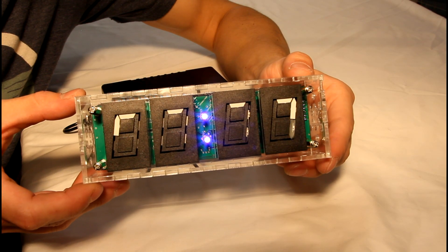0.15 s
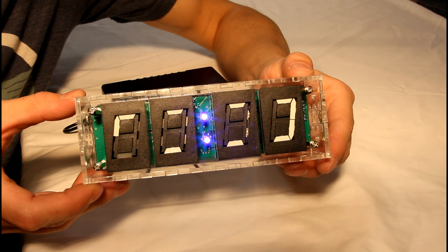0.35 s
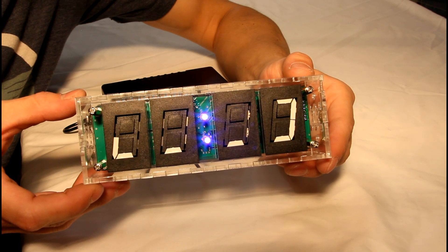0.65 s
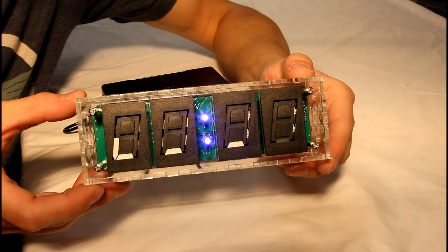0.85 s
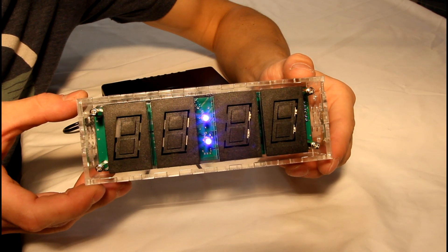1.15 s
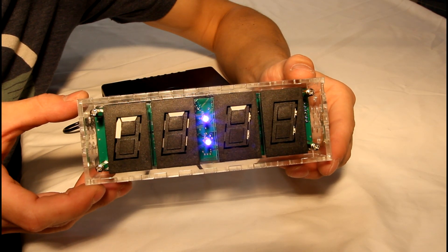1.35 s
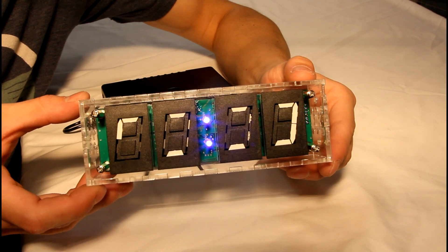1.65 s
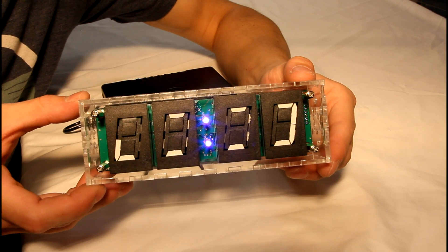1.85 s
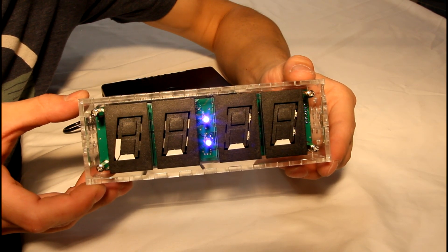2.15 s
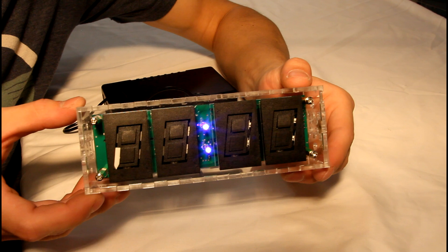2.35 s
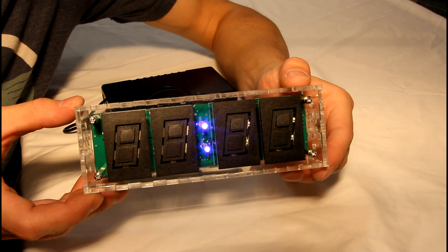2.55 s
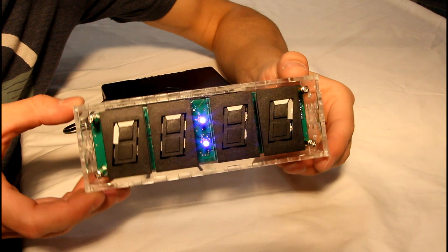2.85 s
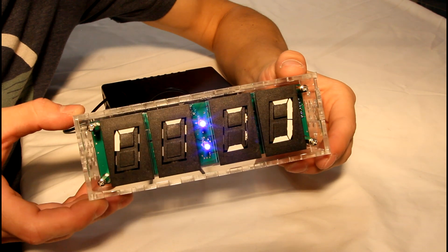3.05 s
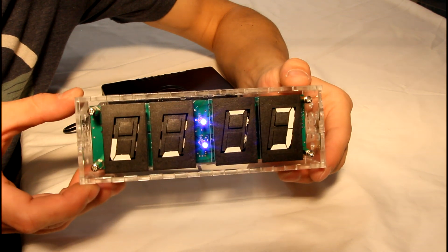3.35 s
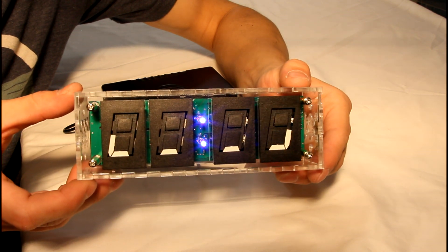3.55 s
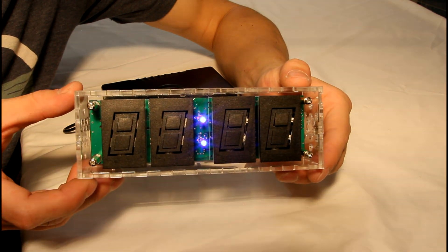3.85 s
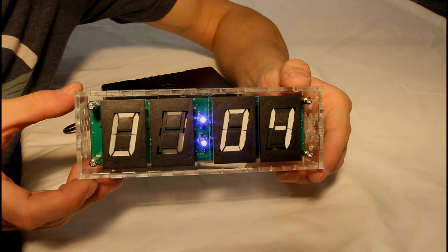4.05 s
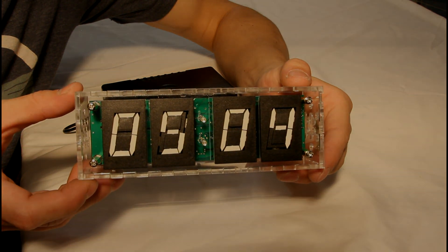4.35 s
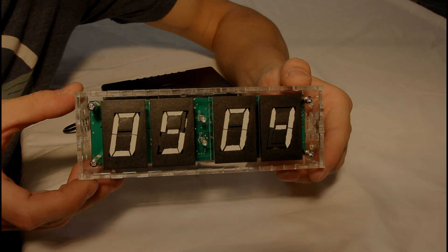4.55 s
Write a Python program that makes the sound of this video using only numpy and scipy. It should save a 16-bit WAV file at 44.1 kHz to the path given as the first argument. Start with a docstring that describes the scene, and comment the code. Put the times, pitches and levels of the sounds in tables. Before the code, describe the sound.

Close up in a small room, a flip-segment clock rattles through three matching runs of fast, crisp clicks, each flap slapping its stop and briefly ringing the plastic case. Each run lasts just over a second, with a tiny gap after it. A single louder, compact clatter finishes the sequence. Quiet hum and hiss continue underneath, and one faint tap sounds elsewhere in the room.

```python
"""Flip-segment clock in a small room

A hand-held electromagnetic clock runs a chase of 24 flaps three times, then sets the time in one burst.
Each flap ticks as its coil releases it, slaps its stop and bounces; the plastic case rings briefly.
Below lie a wavering hum, hiss, low swelling tones, a thin whine and one faint tap near the end.
The room reverberates, and the recorder's gain control ducks on the slaps."""
import sys
import numpy as np
from scipy import signal
from scipy.fft import rfft, irfft, next_fast_len
from scipy.io import wavfile
from scipy.ndimage import uniform_filter1d

SR = 44100
rng = np.random.default_rng(int(sys.argv[2]) if len(sys.argv) > 2 else 0)


def transcribe(signal):
    """Save signal, clipped to [-1, 1], as a 16-bit WAV file at the path in sys.argv[1]."""
    frames = np.atleast_2d(signal).T
    limited = np.clip(frames, -1, 1)
    pcm = np.round(limited * 32767).astype(np.int16)
    wavfile.write(sys.argv[1], SR, pcm)


N = 206652

# The flaps in chase order. Each row: lateness in ms, level in dB, hollowness, body, brightness and air
# in dB, clack in Hz and dB, ring in Hz and dB, rattle decay in ms, bounce delay in ms, bounce in dB,
# lead of the release tick in ms, tick in dB, low knock in dB. All levels are relative.
FLAPS = [(-0.29, -17, -8, 0, 0, 6, 4530, -5.5, 6660, -0.5, 2.7, 16, -22, 7.2, -18, -9),
         (.2, -22, -7, -0.5, 3, 13.5, 4220, -1, 7140, 2, 2.7, 14.6, -20, 6.2, -14, 1.5),
         (0, -20, 1, -4, 5, 13, 3900, -0.5, 6700, -1, 3, 9.7, -31, 9.4, -19, 1),
         (-.8, -21, -13, 1, -4.5, 10.5, 4170, 2.5, 6680, 5, 3.8, 21, -24, 6, -19, 8.5),
         (-0.2, -20.5, -14, -0.5, -1, 8, 4640, -2, 7600, 0, 3.2, 4.8, -10, 5.7, -15, 1),
         (0.4, -19.5, 0.5, 0.5, -9.5, 8, 4180, 2, 6400, -1, 2.3, 7.3, -9.5, 7.5, -22, -4),
         (-0.8, -16.5, -2.5, 4, -6.5, -8, 4380, 2.5, 5590, -12, 2, 8.4, -19, 7.5, -20.5, -15),
         (-1.1, -18.5, -10, -2, -4, -5, 4640, -4.5, 7840, 4, 4.1, 7.8, -6.5, 6.4, -18, -7),
         (-1, -17.5, -5, 0, 3, -3, 4140, 1, 6730, 4, 2.7, 13, -23, 9.7, -22, 3),
         (-1.2, -18, -6, 0.5, 4, -1, 4210, -2.5, 7170, 1.5, 3.6, 6.4, -15, 8, -22, 7.5),
         (-1.5, -18, -3, -0.5, 5, 5, 4120, -3.5, 6570, 0.5, 6, 6, -5, 11, -17.5, -7.5),
         (-0.5, -17.5, -10, 5.5, -1, 0, 4270, -2.5, 5140, -1, 3.8, 13, -16, 8.9, -23, -6),
         (-1.5, -16.5, 12, 5.5, -6, 3.5, 4120, -7.5, 6230, -0.5, 1.3, 10.8, -7.5, 9.2, -23, 7),
         (-1, -17.5, -8, -2.5, -5.5, 4.5, 4400, -1.5, 10000, -6.5, 2.1, 12.2, -6.5, 8.3, -30, -8),
         (-0.6, -21.5, -1, 2, -3, 5.5, 4260, -2.5, 7300, -1.5, 2.2, 12.5, -6, 7.5, -25, -2),
         (-0.8, -19, 0, -1.5, -5, 6.5, 4150, 1, 7200, 0, 2.3, 12.8, -3, 8.6, -19, 4.5),
         (-1.5, -19, -14.5, -0.5, -15, 3, 4500, -8, 6900, 1.5, 4.3, 11.5, -27, 5, -15, -1.5),
         (-0.6, -22.5, 6, 4.5, -16, -4, 3700, 1.5, 6500, 0, 2.2, 11.8, -9, 8, -15, 1),
         (-0.72, -18.5, -5, -2, -17, -12, 4200, -0.5, 5650, 3.5, 2.1, 9.6, -18, 6.5, -19, -8),
         (-0.7, -19.5, -24, -2.5, -2, -2, 4170, -4, 5940, 0, 2.9, 9.5, -7.5, 2.2, -20, -11),
         (-1.2, -21, -1, 1, -9, -6, 4220, 10.5, 6500, -3, 0.92, 8.8, -17, 3.2, -27, 3.5),
         (0, -21, -19, -3.5, 7, -7, 3740, 4.5, 6230, -1.5, 2.5, 7.4, -32, 1.8, -20, -3.5),
         (-1.5, -18, -18, -2, -2, 4, 4320, 2, 7050, -2.5, 1.7, 6.5, -28, 1.5, -22, -10),
         (.6, -20, 15, 2.5, -5, -1.5, 4430, -2.5, 6400, -5, 2.2, 12.5, -10.5, 8, -26, -10)]


def from_db(db):
    """Amplitude grows tenfold for every 20 dB."""
    return 10 ** (np.asarray(db) / 20)


def at_hz(points, hz):
    """Interpolation of (frequency, value) rows on a logarithmic frequency axis."""
    points = np.array(points)
    return np.interp(np.log(np.maximum(hz, 1)), np.log(points[:, 0]), points[:, 1])


def drift(rate_hz):
    """Slow random modulation: straight lines between Gaussian values."""
    knots = int(N / SR * rate_hz) + 2
    return np.interp(np.linspace(0, knots - 1, N), np.arange(knots), rng.standard_normal(knots))


def resonate(x, hz, width_hz):
    """A damped two-pole resonator, scaled to pass white noise at unchanged power."""
    radius = np.exp(-np.pi * width_hz / SR)
    feedback = [1, -2 * radius * np.cos(2 * np.pi * hz / SR), radius ** 2]
    return signal.lfilter(np.sqrt((1 - radius ** 2) / 2) * np.array([1, 0, -1]), feedback, x + 1e-18)


def hum(t, waver_db=3.5):
    """Independent amplitude modulation makes each partial of the hum waver."""
    # Each row: frequency in Hz, rms level in dB.
    partials = [(118.4, -53), (183.0, -55.5), (236.9, -50.5), (414.5, -55.5), (473.7, -58)]
    return sum(np.sqrt(2) * from_db(db + waver_db * drift(9))
               * np.sin(2 * np.pi * (hz * t + rng.random())) for hz, db in partials)


def hiss(t, crossover_hz=2500, treble_db=-53):
    """Spectrally shaped noise: the band below the crossover swells slowly, the treble stays steady."""
    # Each row: frequency in Hz, relative spectral density in dB.
    spectrum = [(18, -59), (30, -18), (165, -8.5), (244, -9), (317, -11.5), (412, -16.5), (2380, -26.5),
                (5000, -30), (15700, -36.5)]
    # Each row: time in seconds, level of the lower band in dB.
    swell = [(0.0, -43.5), (1.4, -43), (1.72, -39), (2.2, -40), (2.5, -42.5), (3.6, -41.5), (4.36, -42.5),
             (4.69, -38.5)]
    size = next_fast_len(N)
    colour = from_db(at_hz(spectrum, np.arange(size // 2 + 1) * SR / size))
    noise = irfft(rfft(rng.standard_normal(size)) * colour, size)[:N]
    noise /= np.sqrt(np.mean(noise ** 2))
    dull = signal.sosfiltfilt(signal.butter(2, crossover_hz, fs=SR, output="sos"), noise)
    return from_db(np.interp(t, *np.transpose(swell))) * dull + from_db(treble_db) * (noise - dull)


def low_tones(t):
    """Low sinusoids come and go under flat-topped envelopes."""
    # Each row: centre in seconds, half length in seconds, frequency in Hz, peak level in dB.
    swells = [(3.24, 0.12, 178, -42), (3.617, 0.073, 210.8, -38.5), (3.62, 0.11, 155, -40.5),
              (3.864, 0.084, 180, -36.5), (4.578, 0.16, 167, -38.5), (4.659, 0.1, 120.3, -40)]
    return sum(from_db(db) * np.exp(-((t - centre_s) / half_s) ** 4) * np.sin(2 * np.pi * hz * t)
               for centre_s, half_s, hz, db in swells)


def whine(t, hz=15680, rms_db=-66):
    """A steady pure tone near the upper limit of hearing."""
    return np.sqrt(2) * from_db(rms_db) * np.sin(2 * np.pi * hz * t)


def tap(t, start_s=4.530, hz=2090, ring_db=-31, ring_t60_s=.055, tail_db=-42.5, tail_t60_s=.6):
    """A tap elsewhere in the room: one damped mode with a soft onset, and its reverberation."""
    age = np.maximum(t - start_s, 0)
    onset = 1 - np.exp(-age / 0.0049)
    ring = onset * from_db(ring_db - 60 * age / ring_t60_s) * np.sin(2 * np.pi * hz * age)
    tail = (age > 0) * from_db(tail_db - 60 * age / tail_t60_s) * rng.standard_normal(N)
    lowpass = signal.butter(4, 2400, fs=SR, output="sos")
    return ring + signal.sosfilt(lowpass, resonate(tail, hz, width_hz=900))


def room(x, early_db=9, early_speedup=8.4):
    """Diffuse reverberation with two decay slopes; case and table top add the strong, quick first one."""
    # Each row: frequency in Hz, reverberation time (t60) in seconds, relative level in dB.
    decay = [(960, 0.56, -12), (2397, 0.3, -2), (5000, 0.28, -2.5), (9040, 0.33, -5.5), (14500, 0.18, -15)]
    t = np.arange(SR // 2) / SR
    edges_hz = 700 * 2 ** np.arange(0, 4.9, 1 / 3)
    tail = np.zeros(len(t))
    for low, high in zip(edges_hz, edges_hz[1:]):
        bandpass = signal.butter(2, [low, high], "band", fs=SR, output="sos")
        band = signal.sosfilt(bandpass, rng.standard_normal(len(t)))
        hz = np.sqrt(low * high)
        gain = from_db(at_hz(np.array(decay)[:, ::2], hz))
        fall_db = -60 * t / at_hz(decay, hz)
        tail += band * gain * (from_db(fall_db) + from_db(early_db + early_speedup * fall_db))
    return signal.fftconvolve(x, tail / np.sqrt(np.sum(tail ** 2)))[:N]


def strikes(step_s=.053):
    """Impact times: one coil fires per step of a chase; in the burst the flaps' colours blend."""
    # Each entry: start of a chase in seconds.
    rounds = [-0.0689, 1.2506, 2.6837]
    # The final burst. Each row: time in seconds, level in dB.
    burst = [(4.0630, -16.5), (4.0665, -20), (4.0688, -16.5), (4.0722, -17.5), (4.0760, -14), (4.0780, -15),
             (4.0810, -20), (4.0880, -15), (4.0990, -19), (4.1028, -20), (4.1064, -15), (4.1078, -16.5),
             (4.1118, -18), (4.1185, -18), (4.1228, -16.5), (4.1278, -22), (4.1312, -18.5), (4.1382, -18),
             (4.1450, -33)]
    # Each strike: time in seconds, flap number, level in dB, share of the flap's own character.
    chase = [(start + step_s * k + flap[0] / 1000, k, flap[1], 1)
             for start in rounds for k, flap in enumerate(FLAPS)]
    return chase + [(time_s, k, db, .5) for k, (time_s, db) in enumerate(burst)]


def contact(t, noise, rattle_s, rattle_db):
    """A hard contact is an impulse of force, followed by the decaying rattle of loose parts."""
    spike = np.abs(t) <= .5 / SR
    return spike + (t > 0) * from_db(rattle_db) * np.exp(-np.maximum(t, 0) / rattle_s) * noise


def flap_force(t, noise, own, rattle_ms, bounce_ms, bounce_db, ahead_ms, tick_db):
    """Three contacts superpose: the release tick, the slap on the stop at t = 0, and the rebound."""
    slap = contact(t, noise, rattle_ms / 1000, -13.5)
    bounce_s = bounce_ms / 1000 + rng.normal(0, .0007)
    bounce = own * from_db(bounce_db) * contact(t - bounce_s, noise, 0.0029, -17.0)
    since_release = t + ahead_ms / 1000
    tick = contact(since_release, noise, 0.0024, -9.5) + own * contact(since_release, noise, 0.025, -15.5)
    return slap + bounce + from_db(tick_db - 3.5) * signal.lfilter([1, -.4], [1], tick)


def clock(alike=0.73, detune=0.0054, spread_db=0.36, uneven_db=0.63, snap_db=-6.5, shimmer_s=0.014):
    """Modal synthesis: flap impacts excite case and flaps. Returns direct sound and bare forces."""
    # Each row: frequency in Hz, bandwidth in Hz, level in dB, then the dB gained per dB of a flap's
    # hollowness, body, brightness, air and clack.
    modes = [(1449, 207, -26.5, 0, 0, 0, 0, 0), (2063, 490, -20.5, 1, 0.3, 0.035, 0.067, -0.15),
             (2843, 1260, -10, 0, 0.91, 0.042, 0.019, 0.064), (4200, 300, -4.5, 0, 0, 0.07, 0, 0.88),
             (6450, 410, -6, 0, 0, 0, 0, 0), (7940, 690, -9, 0, 0, 0, 0.081, -0.25),
             (9920, 720, -7.5, 0, 0, 0.2, 0, -0.28), (12740, 600, -12, 0, 0.31, 0.87, 0.35, 0.33),
             (14880, 590, -14, 0, 0, 0, 0.94, -0.22), (14880, 300, -23, 0, 0, 0, 0.8, 0)]
    modes = np.array(modes)
    knock, clack, ring, shimmer = 0, 3, 4, len(modes) - 1      # rows of the mode table
    lead, run_in = 600, SR // 10      # samples before each slap and before the scene
    attack = slice(lead, 900)      # the stretch that sets a strike's level
    t = (np.arange(2600) - lead) / SR
    # The bare crack of the slap, heard straight from the stop.
    snap = signal.sosfilt(signal.butter(2, [4240, 12700], "band", fs=SR, output="sos"), t == 0)
    snap /= np.std(snap[attack])
    # Each flap repeats nearly the same chatter, and its seat in the case detunes the modes a little.
    shape = (len(FLAPS), len(t))
    chatter = rng.standard_normal(shape) * from_db(rng.normal(0, 5.6, shape))
    seat_hz = modes[:, 0] * (1 + detune * rng.standard_normal((len(FLAPS), len(modes))))
    direct, blows = np.zeros((2, run_in + N))
    for time_s, flap, level_db, own in strikes():
        hollow_db, body_db, bright_db, air_db, clack_hz, clack_db, ring_hz, ring_db = FLAPS[flap][2:10]
        *motion, knock_db = FLAPS[flap][10:]
        colour_db = modes[:, 3:] @ [hollow_db, body_db, bright_db, air_db, clack_db]
        colour_db[[knock, ring]] = knock_db, ring_db
        pitches = seat_hz[flap].copy()
        pitches[[clack, ring]] = clack_hz, ring_hz
        level_db += rng.normal(0, uneven_db)
        noise = np.sqrt(alike) * chatter[flap] + np.sqrt(1 - alike) * rng.standard_normal(len(t))
        noise = signal.lfilter([1, -.4], [1], noise)      # tiny parts rattle bright
        force = flap_force(t, noise, own, *motion)
        tremble = contact(t, noise, shimmer_s, 0)      # trembling on the stop sustains the top mode
        gains = from_db(modes[:, 2] + own * colour_db + level_db + rng.normal(0, spread_db, len(modes)))
        start = run_in + round(time_s * SR) - lead
        span = slice(start, start + len(t))
        blows[span] += from_db(level_db) * force / np.std(force[attack])
        direct[span] += own * from_db(level_db + snap_db + own * bright_db / 2 + rng.normal(0, 1.7)) * snap
        for k, (gain, hz, width_hz) in enumerate(zip(gains, pitches, modes[:, 1])):
            rung = resonate(tremble if k == shimmer else force, hz, width_hz)
            # Steeper skirts for the shimmer and for the walls, which radiate little off their pitch.
            if k == shimmer or hz < 3300:
                rung = resonate(rung, hz, width_hz)
            direct[span] += (-1) ** k * gain * rung / np.std(rung[attack])
    return direct[run_in:], blows[run_in:]


def scene():
    """Direct and diffuse fields add; the room gathers sound from all sides, evening out flap colours."""
    t = np.arange(N) / SR
    direct, blows = clock()
    diffuse = from_db(-14.5) * room(direct) + from_db(-6.5) * room(blows)
    background = hum(t) + hiss(t) + low_tones(t) + whine(t) + tap(t)
    return (direct + diffuse + background)[None]


def record(dry, threshold_db=-30, slope=0.22, release_db_s=14, mic_top_hz=15300, cutoff_hz=17150):
    """Compression with slow recovery, between the microphone's treble roll-off and a steep band limit."""
    mic = signal.sosfilt(signal.butter(4, mic_top_hz, fs=SR, output="sos"), dry)
    level_db = 10 * np.log10(uniform_filter1d(mic[0] ** 2, 3000) + 1e-12)
    release_db = release_db_s * np.arange(N) / SR
    held_db = np.maximum.accumulate(level_db + release_db) - release_db
    gain_db = -slope * np.maximum(held_db - threshold_db, 0)
    ducked = np.clip(mic * from_db(gain_db), -1, 1)
    return signal.sosfilt(signal.cheby2(20, 80, cutoff_hz, fs=SR, output="sos"), ducked)


dry = scene()
out = record(dry)
transcribe(out)
```